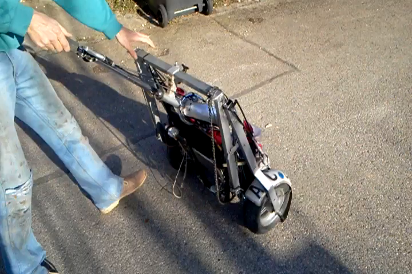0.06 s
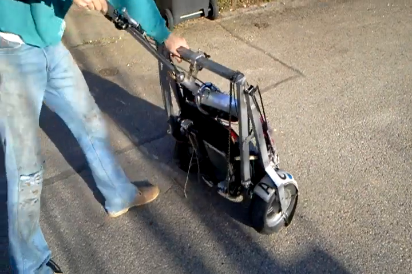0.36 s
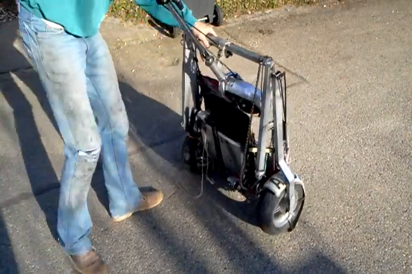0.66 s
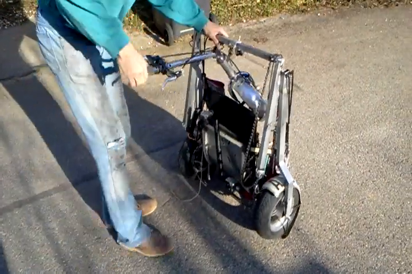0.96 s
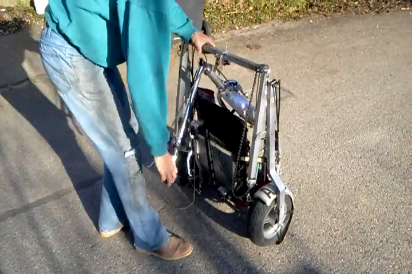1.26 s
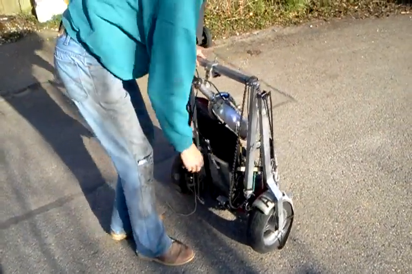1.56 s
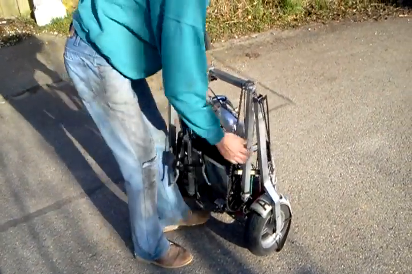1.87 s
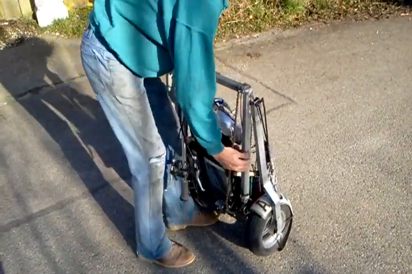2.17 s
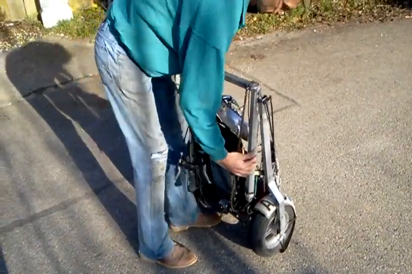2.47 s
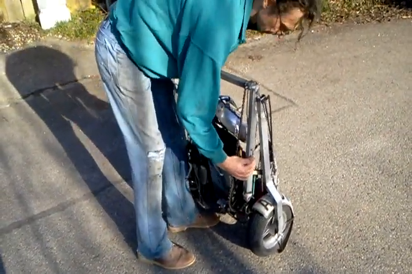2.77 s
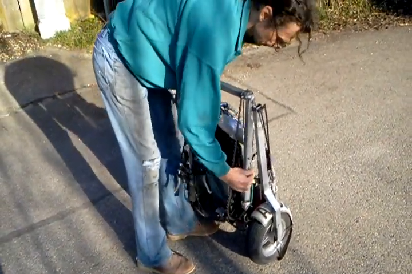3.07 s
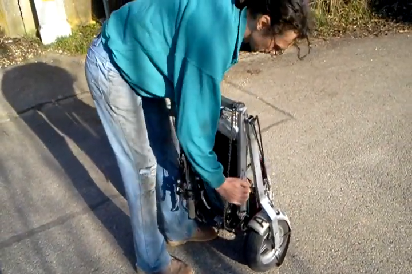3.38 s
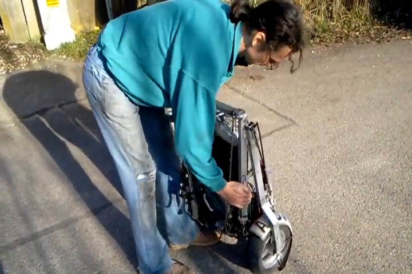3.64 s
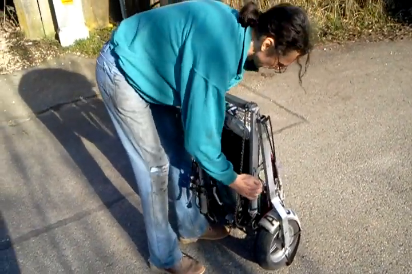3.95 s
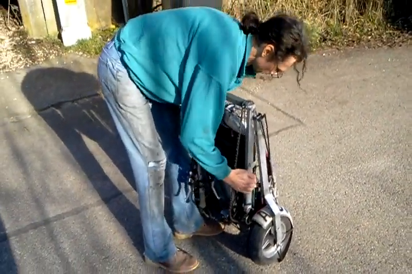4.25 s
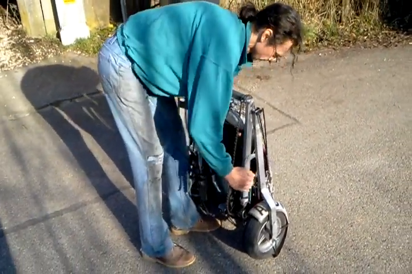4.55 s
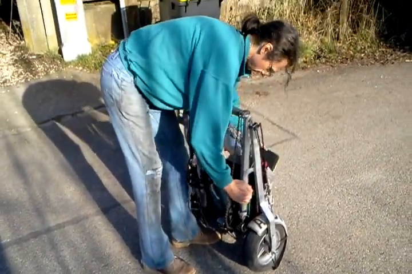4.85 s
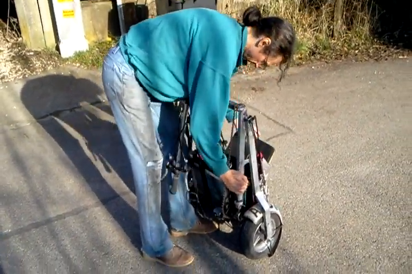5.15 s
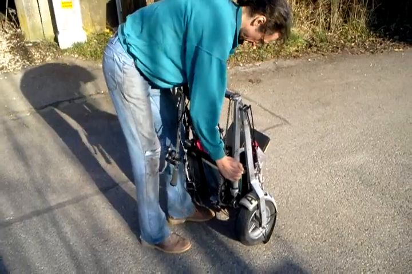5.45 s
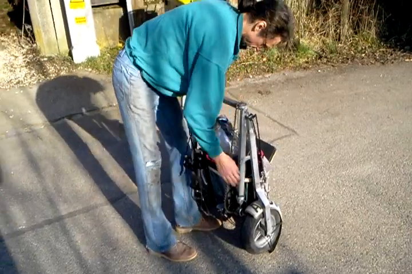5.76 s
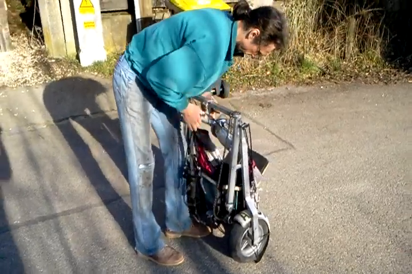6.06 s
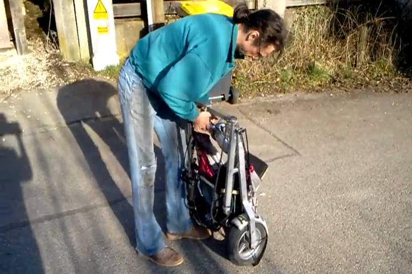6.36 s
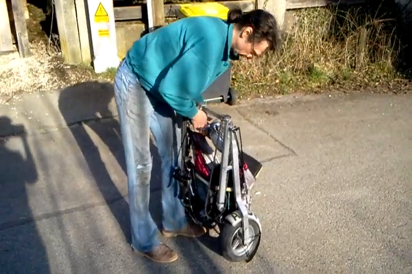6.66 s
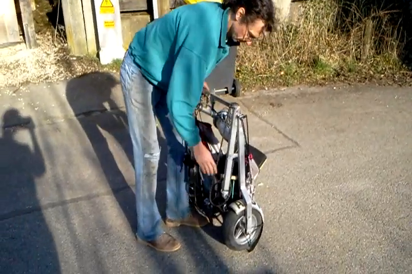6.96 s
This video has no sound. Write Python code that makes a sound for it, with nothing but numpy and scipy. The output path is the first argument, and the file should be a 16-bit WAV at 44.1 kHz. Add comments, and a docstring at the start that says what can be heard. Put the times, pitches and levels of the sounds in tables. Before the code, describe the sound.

After silence, a faint outdoor hiss begins at about 0.7 seconds with a few tiny metallic clicks. Wind buffets the microphone in dull rumbles from 1 to 2 seconds. A folding metal scooter frame, a few steps away, gives a sharp clank at 1.7 seconds. A bird chirps once, very faintly, at 2.2, and a catch clicks crisply at 2.7. From 3 to 3.6 seconds tubes scrape softly, with ticks, a tiny squeak and a small knock. A loud, bright snap comes at 4.4 seconds. The strongest gust follows at 4.7, rumbling on until nearly 6 seconds under light scrapes, squeaks and rattles. Another sharp click lands at 6 seconds, then a lock slams home at 6.5, the loudest hit, slightly overloading and ringing briefly. The hits have only a short outdoor tail. Low wind and hiss continue to the end, just after 7 seconds.

```python
"""A folded metal scooter frame is opened out on an asphalt lane, a few steps away.
Joints knock, catches snap and a lock slams home: each blow is a noisy clatter plus ringing modes.
Sliding tubes scrape, tick and squeak by stick-slip; fence and hedge return a short tail.
The hardest blows overload the microphone. Gusts buffet it in dull rumbles over a faint outdoor hiss.
A bird gives one faint, rising chirp."""
import sys
import numpy as np
from scipy import signal
from scipy.fft import irfft, next_fast_len
from scipy.io import wavfile
from scipy.ndimage import uniform_filter1d, minimum_filter1d

SR = 44100
rng = np.random.default_rng(int(sys.argv[2]) if len(sys.argv) > 2 else 0)


def wav_out(sig):
    """Save sig, one row per channel (or a flat mono array), as 16-bit PCM at SR to the path in sys.argv[1]."""
    wavfile.write(sys.argv[1], SR, np.round(np.clip(np.atleast_2d(sig).T, -1, 1) * 32767).astype(np.int16))


N = 309582
TIME_S = np.arange(N) / SR
START_S = .728  # silence until here


def amp(db):
    """Decibels to gain."""
    return 10 ** (np.asarray(db) / 20)


def unit(x):
    """Scales to rms 1."""
    return x / np.sqrt(np.mean(x ** 2) + 1e-20)


def add(mix, time_s, sound):
    """Mixes a sound in at time_s."""
    span = mix[round(time_s * SR):][:len(sound)]
    span += sound[:len(span)]


def noise(spectrum, size, low_db=0):
    """Noise of rms 1 with the given (Hz, dB) spectrum, then shelved by low_db below 3 kHz."""
    fft_size = next_fast_len(size, True)
    hz = np.fft.rfftfreq(fft_size, 1 / SR) + 1
    knots_hz, knots_db = np.transpose(spectrum)
    curve_db = np.interp(np.log(hz), np.log(knots_hz), knots_db)
    shape = amp(curve_db) / (1 + (hz / knots_hz[-1]) ** 8)
    shelf = amp(low_db / (1 + (hz / 3000) ** 8))
    phasors = np.exp(2j * np.pi * rng.random(len(hz)))
    return irfft(unit(shape) * shelf * phasors, fft_size, norm="ortho")[:size]


def lowpass(x, cutoff_hz):
    """Steep band limit."""
    return signal.oaconvolve(x, signal.firwin(255, cutoff_hz, window=("kaiser", 8), fs=SR), "same")


# hiss spectrum: (frequency [Hz], density [dB])
HISS_SPECTRUM = [(120, -31), (200, -0.5), (284, -0.5), (403, -2.5), (436, -3), (650, -4), (953, -2),
                 (1210, -9.5), (1330, -7.5), (1460, -10), (1800, -10), (2950, -16), (5320, -9.5),
                 (7550, -26), (9000, -44.5), (11700, -74), (19800, -120)]


def hiss(level_db=-46, start_offset_db=-15, settle_s=0.11):
    """Outdoor hiss: fades up, then holds steady."""
    settling = np.exp(-np.maximum(TIME_S - START_S, 0) / settle_s)
    return amp(level_db + start_offset_db * settling) * noise(HISS_SPECTRUM, N)


# gusts at the microphone: (time [s], length [s], level [dB])
WIND_GUSTS = [ (0.926, 0.033, -30), (1.019, 0.12, -23.5), (1.182, 0.072, -24.5), (1.349, 0.058, -26.5),
              (1.651, .24, -26), (2.048, 0.27, -34.5), (2.478, 0.026, -37.5), (3.024, .1, -37),
              (3.33, 0.053, -38), (3.508, 0.026, -39), (4.124, 0.014, -39), (4.3, 0.022, -39.5),
              (4.704, 0.28, -24), (4.98, 0.18, -25), (5.283, 0.15, -31), (5.481, 0.17, -28.5),
              (5.706, 0.31, -35.5), (6.142, 0.14, -35), (6.367, 0.35, -29), (6.976, 0.027, -38), ]


def gust_envelope_db(rise_s=0.016, fall_s=0.032, sag_db_per_s=9.5, breeze_db=-45):
    """Each gust builds quickly, sags while it lasts and drops back to a light breeze."""
    power = amp(breeze_db) ** 2
    for time_s, length_s, level_db in WIND_GUSTS:
        since_s = TIME_S - time_s
        early_s, age_s, late_s = np.maximum([-since_s, since_s, since_s - length_s], 0)
        edges = np.exp(-early_s / rise_s - late_s / fall_s)
        power = power + (amp(level_db - sag_db_per_s * age_s) * edges) ** 2
    return 10 * np.log10(power)


# hardest eddies: (peak time [s], level [dB], frequency [Hz], half-length [s])
EDDIES = [ (0.949, -26, 69.5, 0.029), (1.063, -14, 162.6, 0.019), (1.106, -17.5, 126, .025),
          (1.12, -21, 246, 0.024), (1.372, -25, 160, .025), (1.692, -21.5, 149, .02),
          (1.719, -19, 186, 0.0074), (1.852, -21, 175, .014), (2.06, -25, 186, .015),
          (4.724, -10, 123.6, .028), (4.736, -11.5, 209.5, 0.014), (4.759, -17.5, 201, .017),
          (4.785, -20, 286, .016), (4.809, -18.5, 167, 0.0094), (4.923, -16.5, 182, 0.0094),
          (5.097, -14, 126.4, 0.021), (5.289, -26.5, 107, 0.018), (5.406, -26.5, 173, .012),
          (5.608, -18, 76.3, 0.022), (5.806, -20.5, 150, 0.015), (5.855, -26, 87, 0.027), ]


def eddy(level_db, hz, half_length_s, waver=0.32, steepening=0.21):
    """An eddy thumps the microphone: uneven pressure swings that steepen at their height."""
    size = round(2 * half_length_s * SR)
    drift = noise([(10, 0.5), (100, 1.0), (300, -12.5), (600, -57.5)], size)
    phase = 2 * np.pi * (np.cumsum(hz * np.exp(waver * drift)) / SR + rng.random())
    swell = np.hanning(size) ** 2
    return amp(level_db) * np.sqrt(2) * swell * np.sin(phase + steepening * swell * np.sin(2 * phase))


# turbulence in light and in strong air: (frequency [Hz], density [dB])
CALM_SPECTRUM = [(8, 1.5), (25, 5.5), (70, -4), (130, -9), (200, -14), (320, -33), (550, -26.5)]
GUST_SPECTRUM = [(15, -8.5), (40, 3), (80, 5), (140, 0.5), (220, -8.5), (320, -14.5), (500, -31.5),
                 (900, -46.5), (2000, -88)]


def wind(calm_db=-1, gust_db=-2, crossover_db=-36, flutter_db=2):
    """Turbulence and eddies at the microphone: light air only rumbles, strong air reaches higher."""
    level_db = gust_envelope_db()
    gust_share = 1 / (1 + np.exp((crossover_db - level_db) / 3))
    flutter = unit(amp(flutter_db * noise([(2, -1.5), (30, 15), (70, -36.5)], N)))
    calm = amp(calm_db) * np.sqrt(1 - gust_share) * noise(CALM_SPECTRUM, N)
    gusty = amp(gust_db) * np.sqrt(gust_share) * noise(GUST_SPECTRUM, N)
    rumble = amp(level_db) * (calm + gusty) * flutter
    for peak_s, eddy_db, hz, half_length_s in EDDIES:
        add(rumble, peak_s - half_length_s, eddy(eddy_db, hz, half_length_s))
    return rumble


def lane(direct, scatter_db=-19, t60_s=0.48, delay_s=0.0098, echoes_per_s=2000):
    """Fence and hedge add a weak, short tail to the direct sound."""
    t = np.arange(SR // 2) / SR
    echoes = rng.choice([-1, 1], len(t)) * (rng.random(len(t)) < echoes_per_s / SR)
    tail = echoes * (t > delay_s) * amp(-60 * t / t60_s)
    return direct + amp(scatter_db) * signal.oaconvolve(direct, tail / np.linalg.norm(tail))[:N]


# brief tones: (time [s], length [s], start [Hz], end [Hz], level [dB], drop to first overtone [dB])
GLIDES = [ (2.206, 0.034, 3630, 4800, -51, 32), (3.195, 0.03, 1505, 1525, -33, 4.5),
          (3.235, 0.029, 1290, 1210, -40, 24), (4.518, 0.033, 1560, 1370, -47.5, 12),
          (5.041, 0.018, 1230, 1160, -36.5, 8.5), (5.07, 0.017, 1750, 1680, -40, 20),
          (5.551, 0.069, 4630, 4600, -46, 39), ]
BIRD_CHIRP = GLIDES[:1]  # faint, rising
FRAME_SQUEAKS = GLIDES[1:]


def glide(length_s, start_hz, end_hz, level_db, drop_db, waver=0.013, flutter_db=3):
    """A bird's chirp or a squeak of the frame: an unsteady, gliding tone with two weaker overtones."""
    size = round(length_s * SR)
    drift, flutter = (unit(uniform_filter1d(rng.standard_normal(size), size=60)) for _ in range(2))
    pitch_hz = np.linspace(start_hz, end_hz, size) * (1 + waver * drift)
    phase = 2 * np.pi * np.cumsum(pitch_hz) / SR
    tone = sum(amp(-drop_db * k * (k + 1) / 2) * np.sin((k + 1) * phase) for k in range(3))
    return amp(level_db) * unit(tone * amp(flutter_db * flutter)) * signal.windows.tukey(size, .7)


# tube resonances: (frequency [Hz], width [Hz], level [dB])
TUBE_BANDS = [(930, 660, -5), (1360, 210, -4.5), (1970, 410, -6.5), (2840, 400, -3.5), (3850, 790, -1.5),
              (4330, 540, -3), (4920, 240, -1), (5530, 430, 3), (6000, 170, -21), (7430, 480, -20.5)]
# tubes sliding in their joints: (time [s], length [s], level [dB], gain above 6.5 kHz [dB])
TUBE_SLIDES = [(1, 0.056, -51.5, -15), (2.959, 0.63, -49, 3), (3.293, 0.042, -35.5, -11),
               (3.88, 0.18, -46, 8), (4.549, 0.12, -46, 1.5), (4.724, 0.25, -38.5, -8),
               (4.97, 0.23, -43.5, 10.5), (5.08, 0.046, -37, 7), (5.162, 0.19, -49.5, 0),
               (6.18, 0.084, -46, 24)]


def slide(length_s, level_db, treble_db, grain_db=4, slips_per_s=70):
    """Stick-slip rubbing excites now one tube resonance, now another."""
    t = np.arange(round(length_s * SR)) / SR
    scrape = 0
    for hz, width_hz, db in TUBE_BANDS:
        slips = np.interp(t * slips_per_s, np.arange(len(t)), rng.standard_normal(len(t)))
        rub = rng.standard_normal(len(t)) * amp(grain_db * slips)
        band = signal.filtfilt(*signal.iirpeak(hz, hz / (2 * width_hz), SR), rub)
        scrape = scrape + amp(db + treble_db * (hz > 6500)) * unit(band)
    return amp(level_db) * unit(scrape) * signal.windows.tukey(len(t), .6)


def grit(length_s, slide_db, ticks_per_s=45, offset_db=-3, spread_db=4):
    """Dry spots on a sliding tube catch and let go in small, uneven ticks."""
    size = round(length_s * SR)
    releases = rng.random(size) < ticks_per_s / SR
    strengths = amp(spread_db * np.clip(rng.standard_normal(size), -2, 2))
    return signal.oaconvolve(releases * strengths, blow(slide_db + offset_db, "tick", 0))


# contact spectrum per part: (frequency [Hz], density [dB])
PART_SPECTRA = { "joint": [(260, -6), (500, -23.5), (900, -5), (1400, -2), (1700, -3.5), (2100, -2),
                (2800, -14.5), (3600, -7), (4800, -1.5), (5500, 3), (6300, -8), (7900, -14), (9000, -40)],
                "catch": [(300, -22.5), (700, -32), (1400, -22.5), (2000, -18.5), (2600, -27), (3050, -13),
                (3700, -25.5), (4600, -9.5), (5300, -1.5), (6100, -14), (7600, -17.5), (8500, -30),
                (9000, -35)], "stud": [(500, -27), (1000, -26), (2000, -23), (2400, -36), (3050, -14),
                (3500, -29), (4150, -14.5), (4950, -1), (5500, -7), (6100, -14), (6800, -15), (7900, -18.5),
                (9000, -40)], "pin": [(400, -32.5), (1100, -24.5), (1600, -30), (2450, -32), (3150, -17),
                (3860, -22.5), (4280, -7.5), (4600, -11), (5600, -0.5), (6100, -9.5), (6600, -1.5),
                (7700, -12.5), (9000, -30.5)], "lock": [(200, -51), (400, -21.5), (700, -20.5),
                (1000, -17.5), (1600, -15), (2900, -16), (3700, -14), (4100, -7.5), (4500, 0), (5000, -4.5),
                (5500, 2.5), (6200, -7.5), (7300, -15), (9000, -33)], "tick": [(500, -26), (2000, -22),
                (2700, -3), (3600, -7), (4700, 7), (6500, -3), (8500, -22)], "tube": [(400, -22),
                (800, -11.5), (1200, 7.5), (1700, -2.5), (2500, -8), (3500, -3), (4500, -4.5), (5900, -1),
                (7000, -12), (9000, -34)], "stop": [(100, -9), (300, 9), (800, -4.5), (1600, 0.5),
                (2500, -13), (3200, -4.5), (4500, -23), (9000, -50)], }
# ringing modes per part: (frequency [Hz], level [dB], t60 [s])
PART_MODES = { "joint": [(969, -15, .12), (1410, -12, .19), (1760, -9, .11), (2067, -2, .055),
              (2200, 0, .05), (4495, -15, .18), (4872, -15, .15), (5426, -3, .17), (5490, 1, .13),
              (5620, -2, .08)], "catch": [(3575, -20, .21), (4194, -15, .35), (4457, -21, .5),
              (5109, -8, .12), (5265, -2, .09), (5835, -3, .08), (6153, -11, .11), (6438, -10, .11)],
              "stud": [(5040, 5, .04), (5650, 6, .07), (6445, -5, 0.083)], "pin": [(4317, -2, .12),
              (5830, 0, .11), (6261, -8, .11), (6490, -4, .12), (6982, -5, .12), (7488, -8, .06)],
              "lock": [(969, -19, .6), (1486, -26, .37), (4105, -13, .25), (4476, -1, .42), (4653, -6, .3),
              (4875, -14, .5), (5366, -8, .25), (5440, -5, .28), (5534, -12, .39), (5630, -8, .28),
              (5765, -6, .25), (5876, -8, .25), (5970, -15, .36), (6100, -11, .29), (6212, -16, .4),
              (6470, -12, .25)], "tick": [(2620, 14, 0.043), (4640, -7, .04)], "tube": [(1200, -4, 0.11),
              (1370, 2, 0.13), (4610, 1, 0.24), (6100, -10, 0.087)], "stop": [(1275, -6, .07),
              (1517, -9, 0.15)], }
# decay per part: (clatter t60 [s], ring level [dB], shiver level [dB])
PART_DECAY = {"joint": (0.062, -11, -15.5), "catch": (0.052, -12.5, -17), "stud": (0.041, -17.5, -34),
              "pin": (0.058, -15, -20), "lock": (.072, -24.5, -13), "tick": (0.011, -31, -38.5),
              "tube": (0.12, -11.5, -17), "stop": (0.036, -7, -11.5)}
# metal on metal: (time [s], level [dB], part, clatter gain below 3 kHz [dB])
FRAME_BLOWS = [ (.731, -46.5, "catch", 11), (.765, -43.5, "catch", 5.5), (.841, -40, "catch", 13.5),
               (1.02, -44, "tube", 2.5), (1.085, -43, "tube", -1), (1.481, -38, "catch", 8),
               (1.6616, -6, "joint", 1.5), (1.777, -37.5, "stop", 5.5), (1.87, -41, "stop", 8.5),
               (2.65, -12.5, "stud", -2.5), (3.047, -28, "tick", -3), (3.0673, -22.5, "tick", 9.5),
               (3.2095, -26.5, "stop", 2), (3.278, -30, "stud", 17), (3.2905, -20, "joint", 4),
               (3.975, -29.5, "catch", -12), (4.267, -33, "tick", 14), (4.357, -2.5, "pin", 2.5),
               (4.784, -31.5, "catch", -5.5), (4.957, -26, "tube", 4), (5.023, -23.5, "catch", -3),
               (5.097, -26.5, "catch", 8), (5.557, -34, "lock", 16.5), (5.972, -29.5, "tube", -5),
               (6.0104, -9, "catch", -3.5), (6.072, -34, "joint", -1), (6.5165, 4.5, "lock", -2.5), ]


def blow(level_db, part, body_db, rise_s=0.00089, shiver_t60_s=0.17, chatter_db=2):
    """A blow rattles a crowd of short modes; the frame shivers on and a few clear modes ring."""
    t = np.arange(SR // 2) / SR
    clatter_t60_s, ring_db, shiver_db = PART_DECAY[part]
    bounce = noise([(150, -4.5), (400, 2.0), (700, -33.0)], len(t))  # the faces bounce on each other
    chatter = unit(amp(chatter_db * bounce))
    attack = 1 - np.exp(-t / rise_s)
    envelope = attack * np.hypot(amp(-60 * t / clatter_t60_s), amp(shiver_db - 60 * t / shiver_t60_s))
    crowd = noise(PART_SPECTRA[part], len(t), low_db=body_db)
    clatter = unit(crowd * chatter * envelope) * crowd.std() * envelope.std()  # chatter adds no energy
    modes = sum(amp(db - 60 * t / t60_s) * np.sin(2 * np.pi * (hz * t + rng.random()))
                for hz, db, t60_s in PART_MODES[part])
    return amp(level_db) * (clatter + amp(ring_db) * attack * modes)


def scene():
    """The frame and a bird in the lane, with wind and hiss; mono."""
    direct = np.zeros(N)
    layers = (blow, FRAME_BLOWS), (slide, TUBE_SLIDES), (glide, BIRD_CHIRP), (glide, FRAME_SQUEAKS)
    for source, events in layers:
        for time_s, *settings in events:
            add(direct, time_s, source(*settings))
    for time_s, length_s, level_db, _ in TUBE_SLIDES:
        add(direct, time_s, grit(length_s, level_db))
    return (lane(direct) + wind() + hiss())[None]


def record(dry):
    """The sound switches on at START_S; a fast limiter flattens the hardest blows and their tips clip."""
    limit, clip_at = .85, .72
    gate = np.clip((TIME_S - START_S) / .002, 0, 1)
    narrow = lowpass(dry[0] * gate, cutoff_hz=8700)
    gain = limit / np.maximum(abs(narrow), limit)
    limited = narrow * uniform_filter1d(minimum_filter1d(gain, size=7), size=7)
    clipped = np.clip(limited, -clip_at, clip_at)
    return lowpass(clipped, cutoff_hz=16200)[None]


dry = scene()
out = record(dry)
wav_out(out)
```